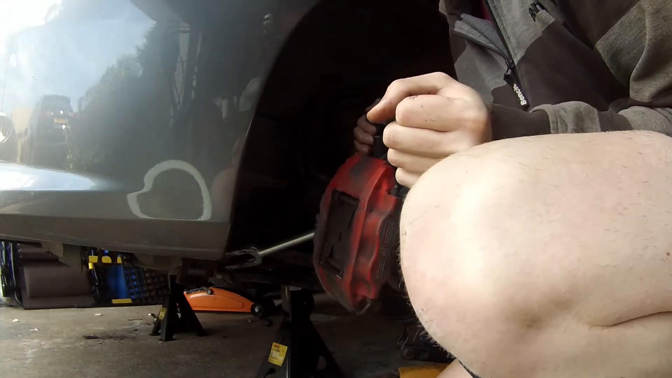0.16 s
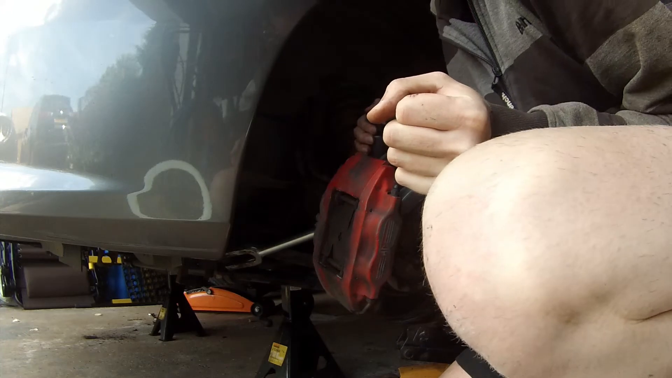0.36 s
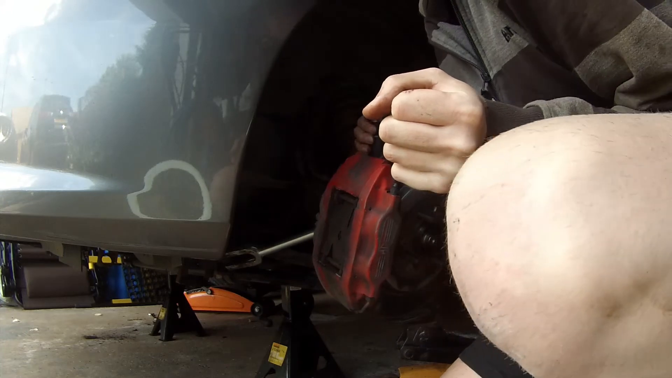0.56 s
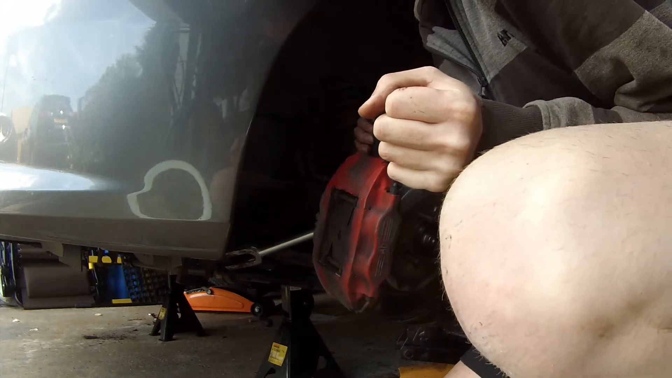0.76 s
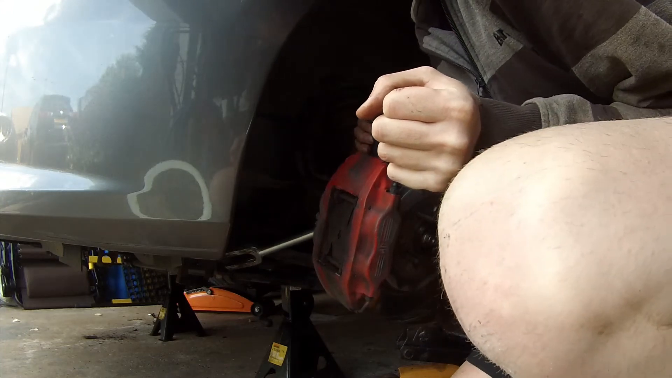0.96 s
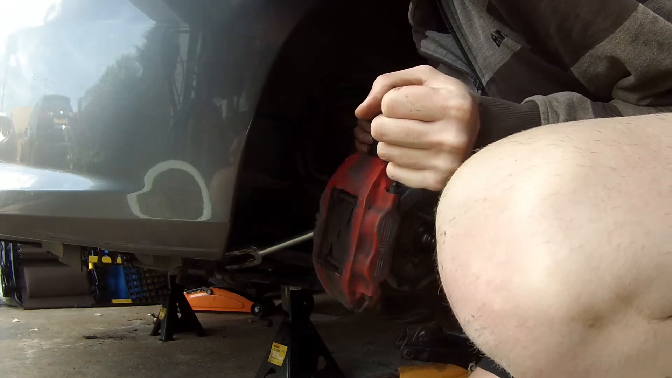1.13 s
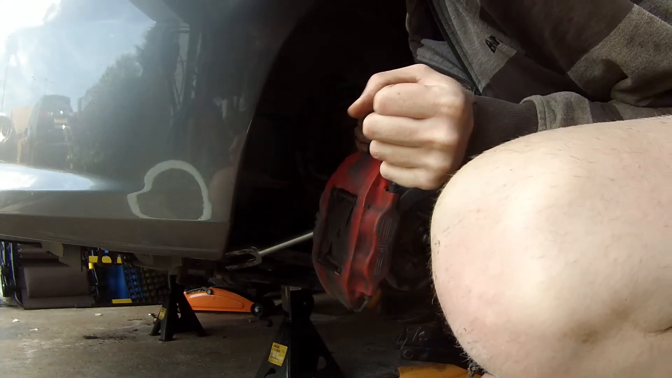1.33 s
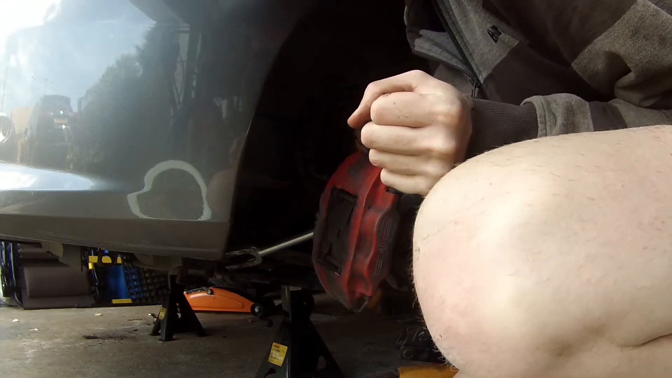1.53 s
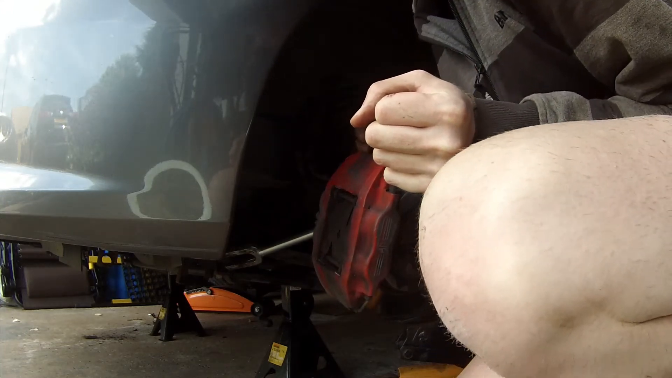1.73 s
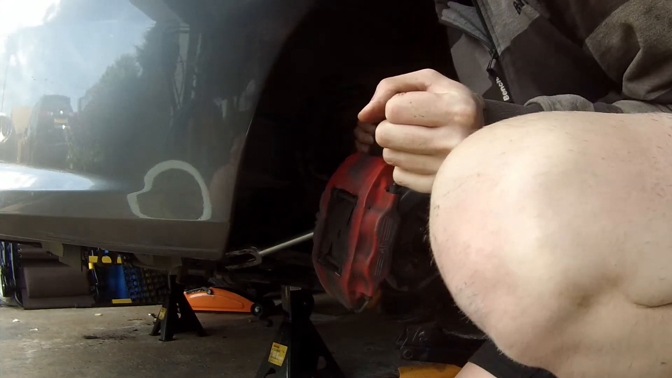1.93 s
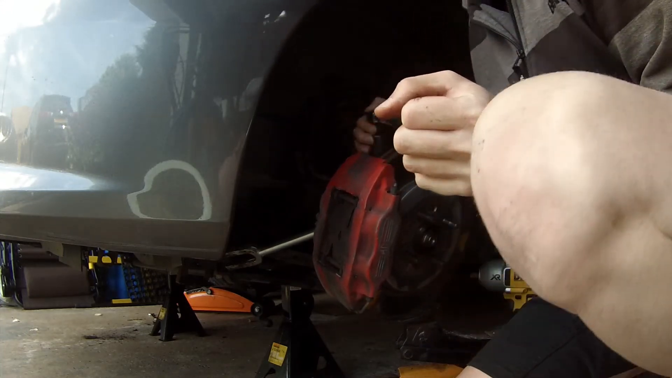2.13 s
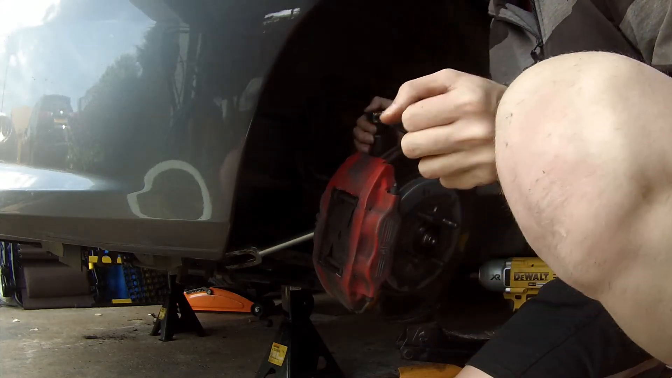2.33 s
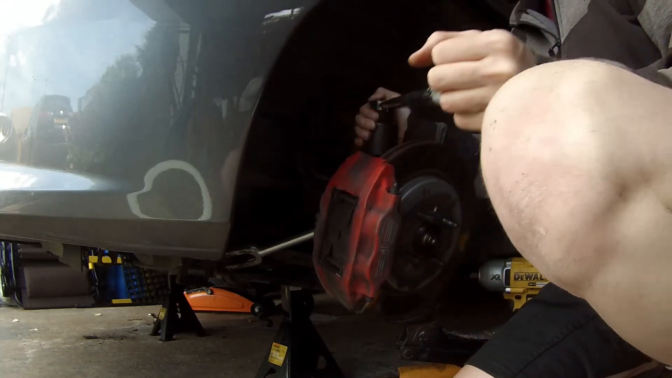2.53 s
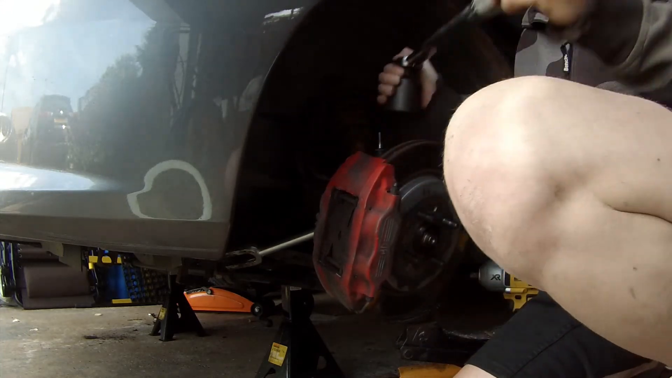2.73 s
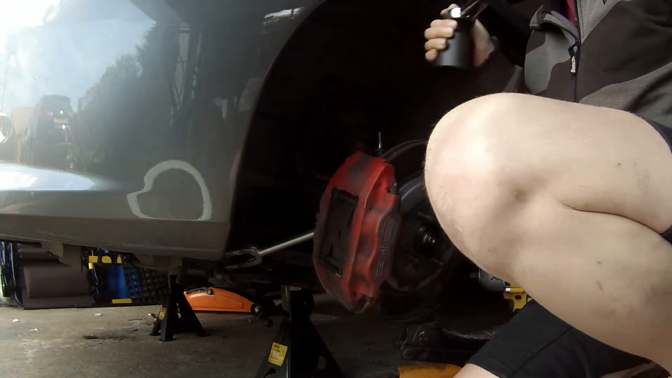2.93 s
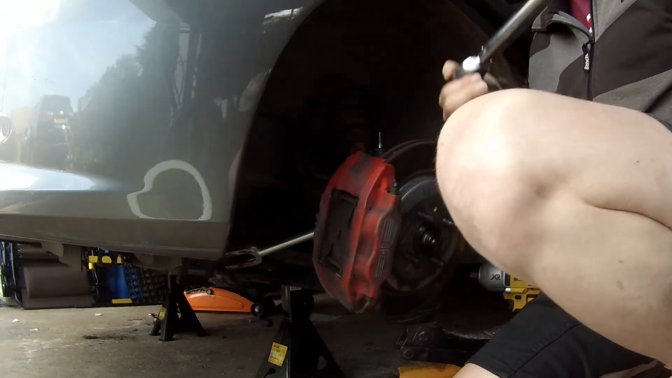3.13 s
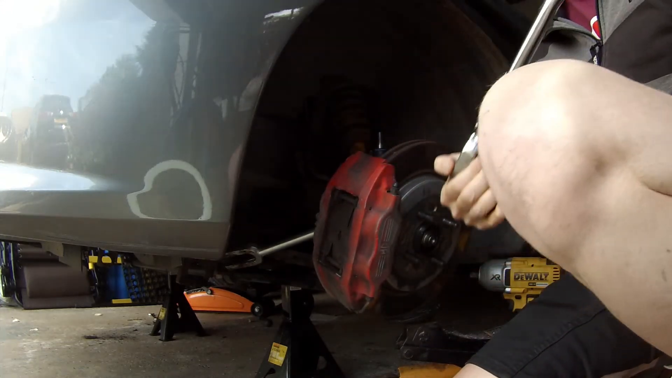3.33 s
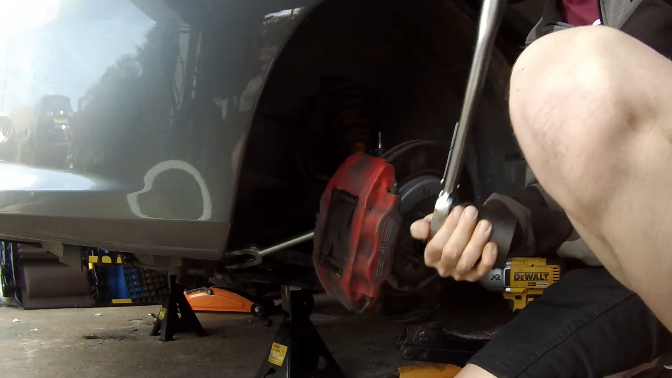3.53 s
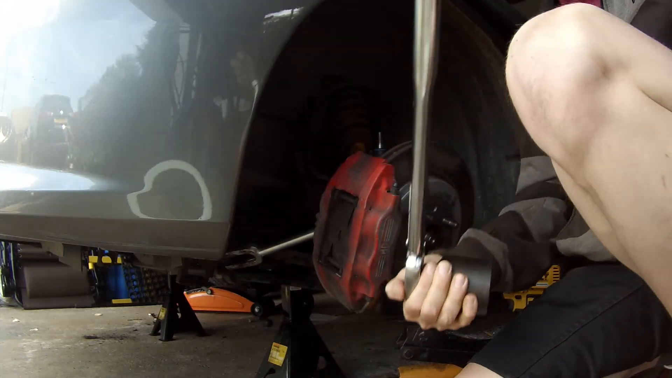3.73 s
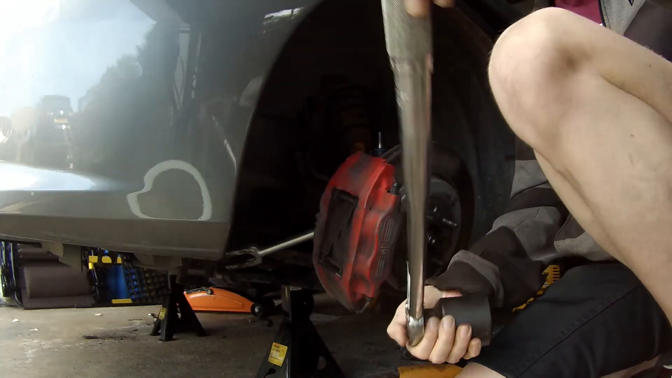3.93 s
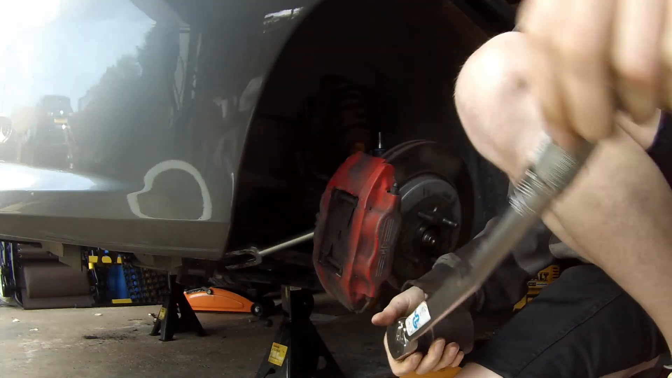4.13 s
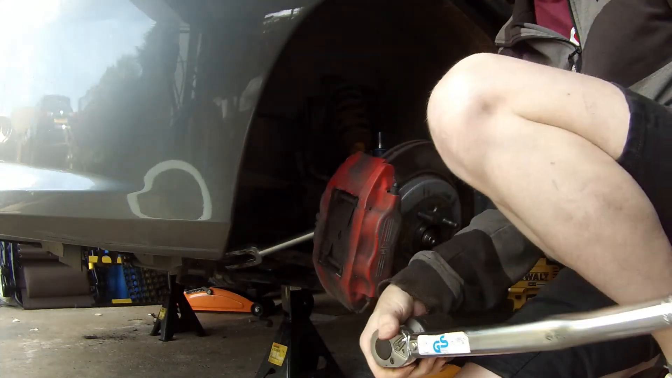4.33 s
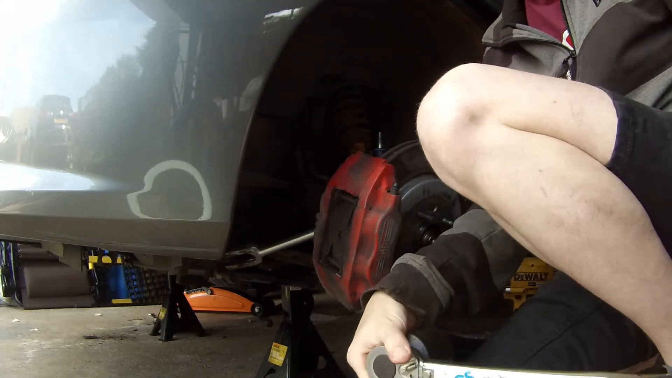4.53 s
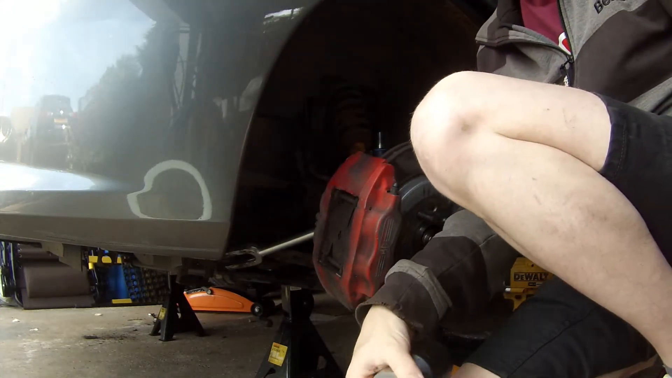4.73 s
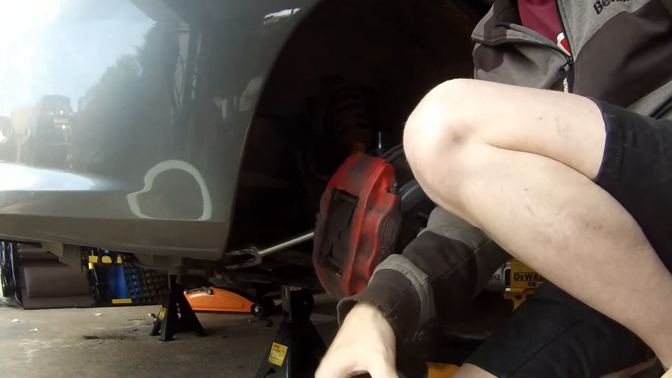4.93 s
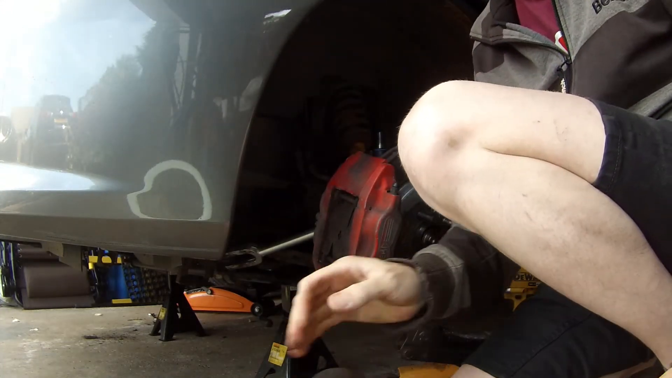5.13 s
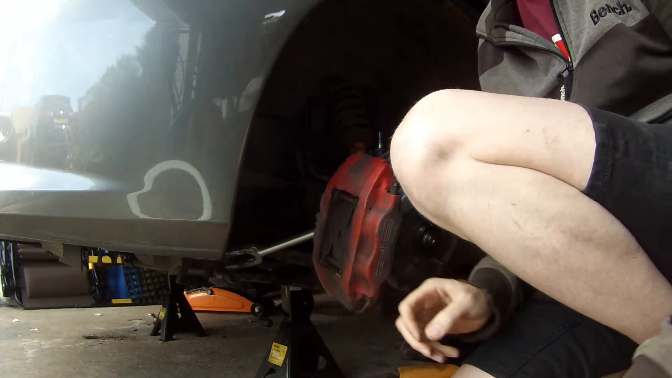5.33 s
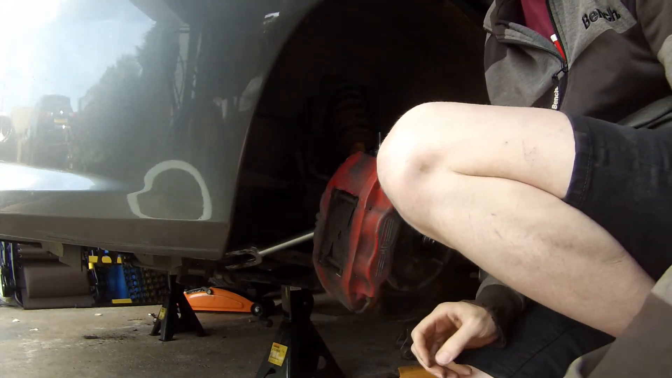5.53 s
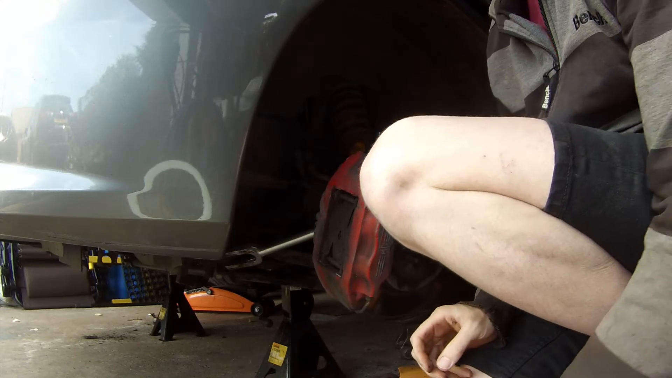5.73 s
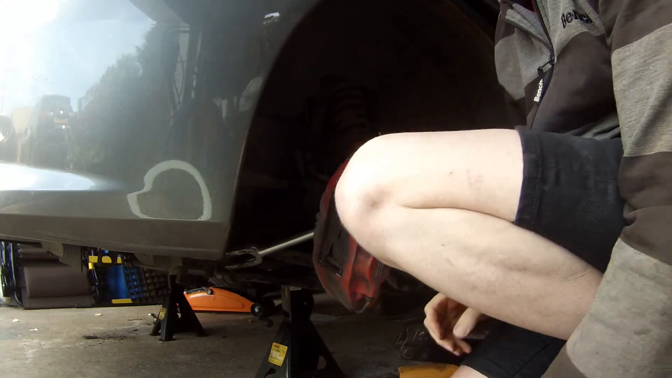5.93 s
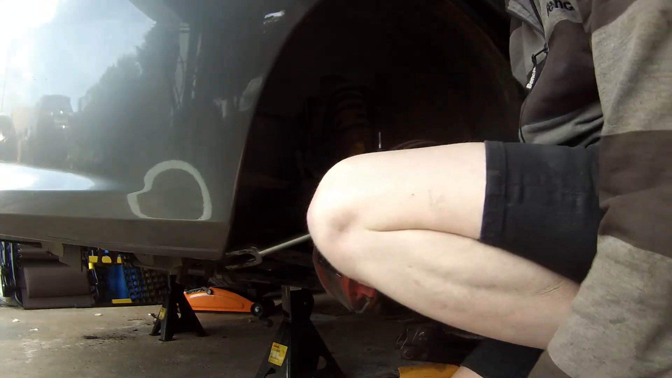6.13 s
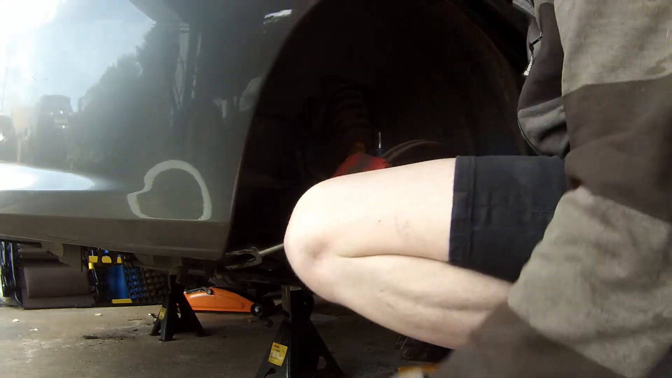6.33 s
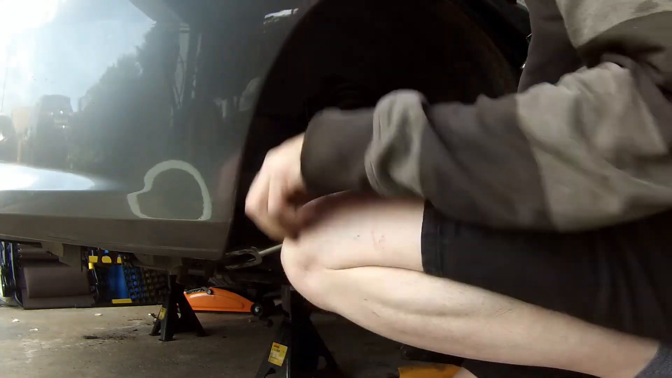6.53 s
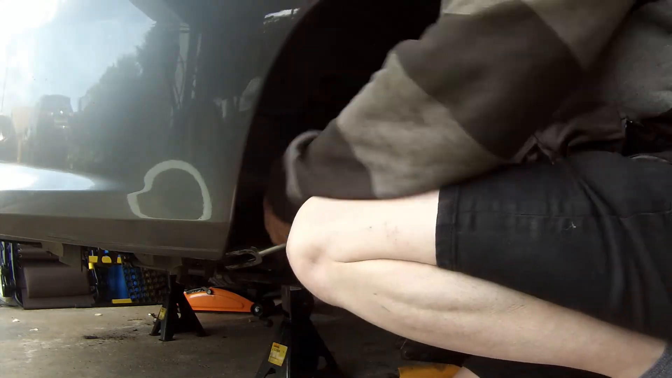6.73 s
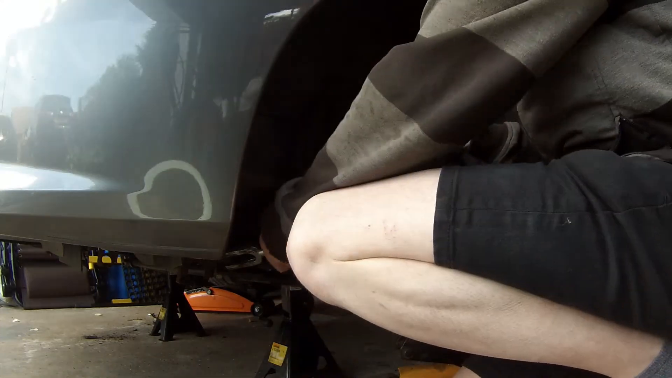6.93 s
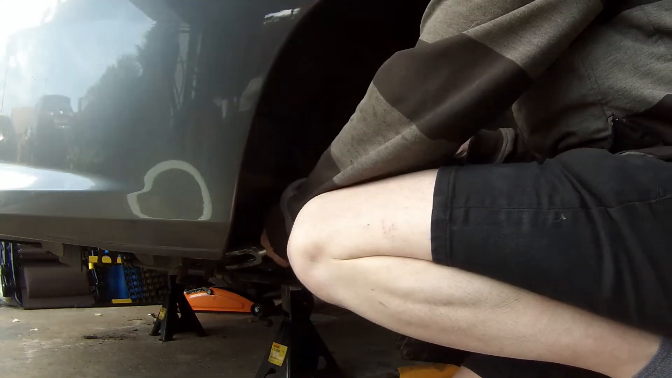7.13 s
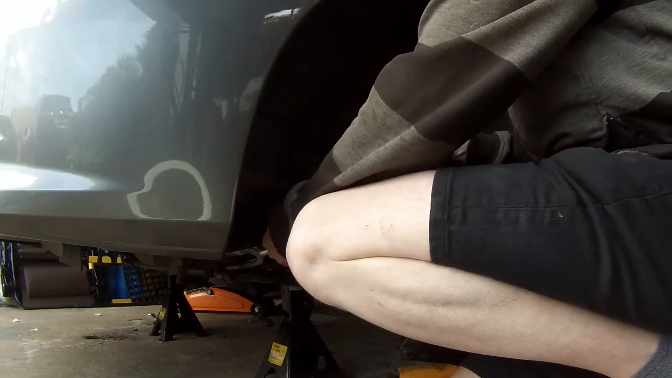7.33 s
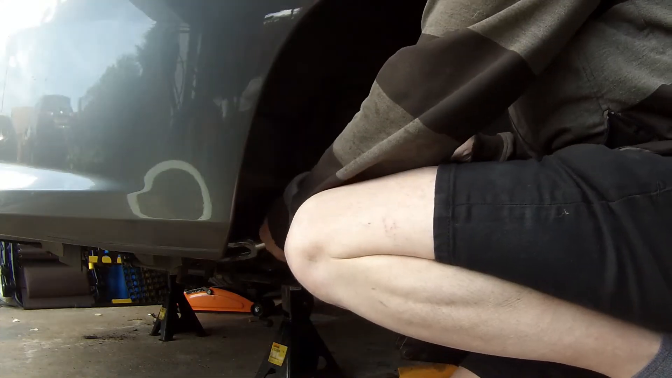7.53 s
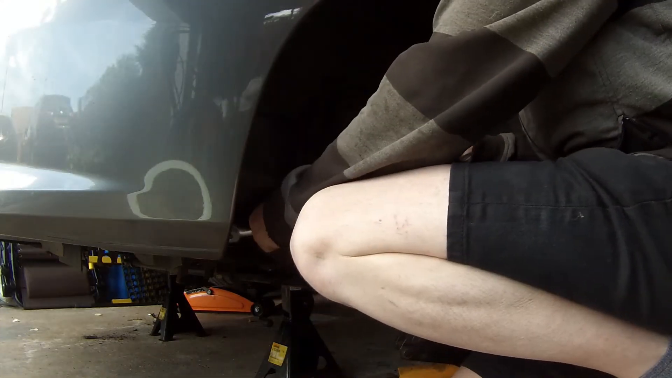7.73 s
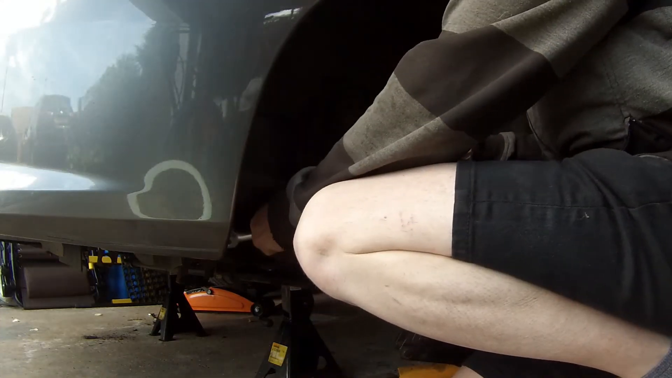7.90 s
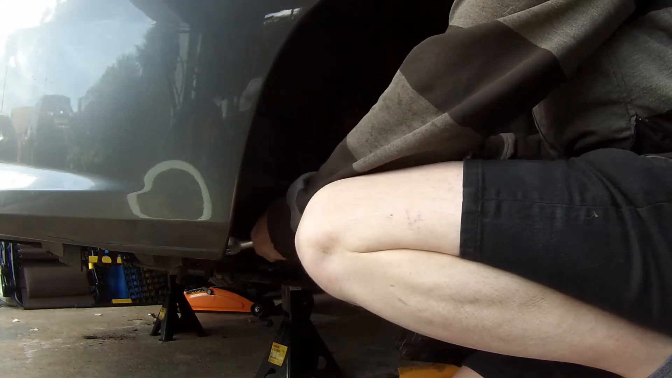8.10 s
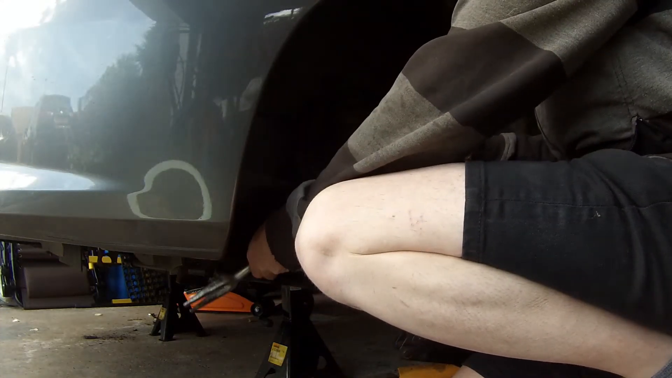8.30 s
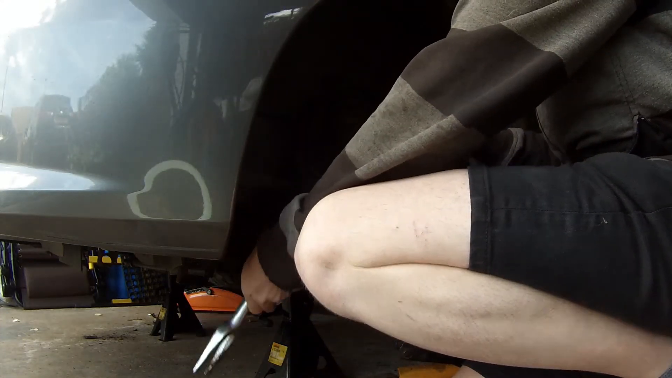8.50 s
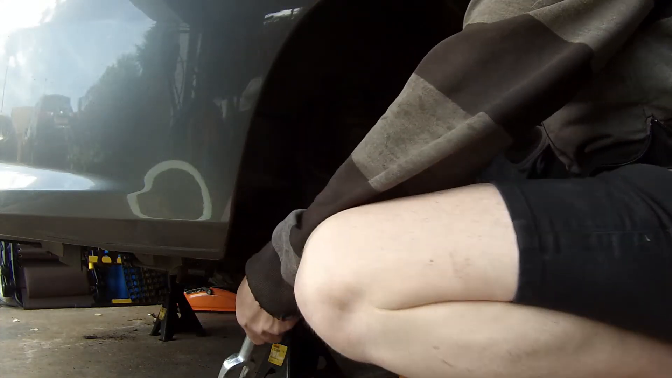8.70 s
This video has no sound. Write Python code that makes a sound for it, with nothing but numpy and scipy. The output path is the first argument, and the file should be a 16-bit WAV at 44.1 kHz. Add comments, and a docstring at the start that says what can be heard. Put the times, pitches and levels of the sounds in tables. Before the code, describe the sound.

A torque wrench snaps twice with a short metallic ring and body shudder, followed by floor knocks, cloth rustle and a clattering steel bar.

```python
"""Two hard steel clicks, floor knocks, then a singing steel bar, over a low hum and faint outdoor air.
In a small garage, a click-type torque wrench breaks over twice on a car's hub bolt, jolting suspension and body.
Wrench and socket are laid down; a forked steel bar is picked up off the concrete. Clothes creak and rustle.
Metal is made from short bursts of shaped noise plus fading sine waves; cloth and air are shaped noise."""
import sys
import numpy as np
from scipy import signal
from scipy.fft import rfft, irfft
from scipy.io import wavfile
from scipy.ndimage import uniform_filter1d

SR = 44100
rng = np.random.default_rng(int(sys.argv[2]) if len(sys.argv) > 2 else 0)


def store_pcm(level_fs):
    """Save levels as 16-bit WAV."""
    pcm = np.round(np.clip(level_fs, -1, 1) * 32767).astype(np.int16)
    wavfile.write(sys.argv[1], SR, np.atleast_2d(pcm).T)


N = 390581
TIME = np.arange(N) / SR
AGE = TIME[:32768]  # seconds since a single sound began
HZ = np.fft.rfftfreq(4096, 1 / SR)  # frequencies at which filters are drawn

# "Fade" below means the seconds a sound takes to drop by 60 dB.
# Outdoor air, its tone. Each row: frequency in Hz, level in dB.
AIR_COLOUR = [(12, -29), (20, 1), (70, -3), (129, -5), (232, -12), (534, -16), (958, -17), (1200, -20),
              (2000, -23.5), (2840, -26), (6910, -36), (14300, -46.5), (15500, -58)]
# Outdoor air, its loudness. Each row: time in seconds, level in dB.
AIR_LEVEL = [(0, -54), (.8, -53), (2.4, -51.5), (8.86, -52)]
# Rumble that follows the hum, its tone. Each row: frequency in Hz, level in dB.
RUMBLE_COLOUR = [(20, -2), (55, -3), (90, -10.5), (180, -7), (260, -21.5), (600, -44), (3000, -83.5)]
# Low hum, rising and falling, strongest at the end. Each row: time in seconds, level in dB.
HUM_LEVEL = [(0, -59), (2.7, -58.5), (3.1, -52), (3.7, -67), (4.35, -52), (5.1, -63.5), (6.3, -51.5),
             (7.3, -56), (7.9, -47.5), (8.86, -45.5)]
HUM_HZ, RUMBLE_DB = 62.5, -7.5  # the rumble is relative to the hum
HUM_WAVER_DB, HUM_WAVER_HZ = 2.8, 2.0  # typical (rms) wander

# Sleeve and grip creaking, one slip for each surge of the pull.
# Each row: start in seconds, length in seconds, level in dB.
CREAKS = [(0.541, 0.036, -58), (0.652, 0.06, -62.5), (0.726, 0.018, -59.5), (0.89, 0.11, -63),
          (1.028, 0.029, -51), (1.084, 0.027, -57.5), (1.133, .03, -55), (1.168, 0.026, -53),
          (1.272, 0.027, -56.5), (1.307, 0.015, -55)]
CREAK_ATTACK_S, CREAK_RELEASE_S = 0.0093, 0.026
# Tone of the creaks. Each row: frequency in Hz, level in dB.
CREAK_COLOUR = [(300, -26), (1500, -6), (2500, 5.5), (4000, -1), (6300, -3.5), (7500, -8), (10500, -9.5),
                (13000, -17), (15500, -16.5)]
# Clothes sliding as the body shifts, then a sleeve brushing the knee.
# Each row: start in seconds, length in seconds, level in dB, tilt in dB per octave, fizz in dB.
SHIFTS = [(5.352, 0.2, -52, 0, 1), (6.58, .1, -58.5, 3.5, 1), (6.661, 0.07, -57, 3.5, 6)]
SHIFT_ATTACK_S, SHIFT_RELEASE_SHARE = 0.057, 0.81  # release as a share of the stroke's length
FIZZ_HZ = 8000  # fizz lies above this
# Tone of sliding cloth. Each row: frequency in Hz, level in dB.
CLOTH_COLOUR = [(150, -13), (700, 12), (1500, 6), (3300, 7), (5500, -6), (9000, -16), (15000, -30)]

# Small ticks of the loaded wrench and of light handling. Each row: start in seconds, relative level in dB,
# centre in Hz, decay constant in seconds, half width in octaves.
TICKS = [(.9196, -32, 9500, 0.0011, 0.46), (.935, -28, 10100, 0.0023, 0.14),
         (1.023, -33, 10300, 0.0022, 0.37), (1.036, -26, 4000, 0.0036, .7), (1.135, -22, 5000, .0022, 0.72),
         (1.2996, -29, 8600, 0.002, 0.44), (1.539, -22, 2920, 0.0082, 0.62),
         (1.621, -26.5, 6950, 0.0026, 0.84), (4.974, -24.5, 2496, 0.0039, 0.42),
         (5.448, -18.5, 4100, .005, 0.29), (5.533, -14.5, 3380, 0.006, 0.2),
         (6.185, -16.5, 2480, 0.0058, 0.73), (6.451, -20.5, 3060, 0.0026, 0.57),
         (7.631, -31, 2170, 0.0058, 0.75), (7.691, -19, 2380, .012, .1)]
# Soft, dull bumps of handling. Each row: start in seconds, relative level in dB, centre in Hz,
# decay constant in seconds, half width in octaves.
BUMPS = [(2.478, -7.5, 1190, 0.021, 0.18), (2.482, -10, 380, 0.032, 0.94),
         (7.109, -16.5, 1180, 0.025, 0.98), (7.112, -8, 292, 0.014, .6), (7.365, -2.5, 294, 0.018, 0.61)]

# Wrench clicks. Each row: start in seconds, blow in dB, chatter length in seconds, main resonance in Hz,
# its lift in dB, tilt in dB per octave, rebound delay in seconds, rebound relative to the blow in dB,
# jolt into the car in dB, panel boom in dB.
CLICKS = [(1.3668, 18.5, 0.0021, 3184, 7, 0.9, .0039, -7.5, 0.5, -6.5),
          (1.9770, 16.5, .0015, 1820, 10.5, -0.2, .0025, -0.5, -0.5, 1)]
# Tone of steel slapping steel. Each row: frequency in Hz, level in dB.
CLICK_COLOUR = [(60, -21), (200, -14), (400, -13), (750, -10.5), (1300, -3.5), (2300, 0), (2900, -2.5),
                (4100, 0.5), (5200, -12), (6300, -11), (7600, -4.5), (9200, -16.5), (11000, -10),
                (12500, -26), (15500, -26)]
# The head swings back against the tube; the tilt is per octave.
REBOUND_HZ, REBOUND_LIFT_DB, REBOUND_TILT_DB, REBOUND_LENGTH_S = 4100, 2, 0.63, 0.00097
# Wrench, socket and bolt ringing at once. Each row: frequency in Hz, level before the jolt in dB, fade in seconds.
WRENCH_MODES = [(1010, -24.5, .11), (1190, -27, 0.12), (1370, -26, 0.25), (1740, -24, 0.09),
                (1935, -29, 0.16), (2216, -29.5, 0.17), (2378, -29.5, 0.24), (3008, -32, 0.12),
                (3360, -30.5, 0.12), (3498, -30.5, 0.14), (3763, -31.5, 0.13), (4002, -29.5, 0.15),
                (4000, -24.5, 0.11), (4387, -34, .13), (4747, -33, .1), (4944, -36.5, .14),
                (5950, -40.5, .14), (7073, -35, .13), (7260, -38, 0.16), (7480, -37, .11), (7897, -38, .09),
                (9590, -46, .1), (11340, -38.5, 0.076)]
# Hub and suspension, slower to build up. Each row: frequency in Hz, level before the jolt in dB, fade in seconds.
HUB_MODES = [(39.9, -33, .5), (101.6, -35, .55), (114, -25, 0.44), (143.1, -32, .36), (226.7, -33, .33),
             (317.7, -40, .42), (450, -41.5, 0.53), (549, -41, .48), (734, -36.5, .28), (854, -38, .15),
             (1372, -41.5, 0.28)]
# Body panels. Each row: frequency in Hz, level before boom and jolt in dB, fade in seconds.
PANEL_MODES = [(308, -29.5, 0.3), (350.5, -24, .22), (401, -33, 0.23), (747, -39.5, 0.2)]
# Many weaker steel tones. Each row: frequency in Hz, level before the jolt in dB.
STEEL_COLOUR = [(1500, -46.5), (2000, -43.5), (3000, -45), (4100, -47), (5200, -53), (7400, -44),
                (9000, -49)]
# How fast those tones die. Each row: frequency in Hz, fade in seconds.
STEEL_DECAY = [(1500, 0.17), (2800, 0.1707), (4200, .21), (9000, 0.095)]
# Dense shudder of suspension and panels. Each row: frequency in Hz, level before the jolt in dB.
BODY_COLOUR = [(35, 15.5), (75, 7.5), (120, 17), (160, 17.5), (195, 10.5), (320, 19.5), (600, 12.5),
               (1200, 10), (2000, 5), (3000, 4), (4100, 9), (5200, -4), (7400, -0.5), (11000, -2),
               (15000, -16.5)]
# How fast the shudder dies. Each row: frequency in Hz, fade in seconds.
BODY_DECAY = [(100, .37), (350, 0.37), (1000, 0.35), (4000, 0.24), (8000, 0.14), (14000, 0.069)]

# Lasting ring of coil spring and brake disc after each click. Each row: frequency in Hz, level in dB, fade in seconds.
SPRING_MODES = [(603, -46, .7), (899, -47.5, 1.3), (1034, -34.5, .55), (1071, -50, .6), (1222, -52, .66),
                (1324, -43.5, .6)]
# Steel left free to sing. Each row: start in seconds, frequency in Hz, level in dB, fade in seconds,
# beat in Hz, strength of the partner tone from 0 to 1.
SINGING = [(1.367, 6200, -47, 0.43, 2.3, 0), (5.921, 5660, -49, 0.33, 2.6, 0.3),
           (5.986, 5680, -52.5, 0.8, 2, 0.23), (6.267, 5690, -64, 1.05, 1.8, 0.5),
           (7.715, 4440, -55, 0.22, 5.7, 0.7), (8.02, 2113, -58, 4.8, 1.55, 0.8),
           (7.976, 9873, -56.5, 0.67, 2, 0.16), (7.976, 2430, -46, 0.18, 2, 0),
           (7.976, 4400, -50, 0.12, 2, 0), (7.976, 4880, -51, 0.13, 2, 0.1), (7.976, 6700, -54, 0.18, 2, 0),
           (7.976, 9200, -58, .16, 2, .1)]

# Tools knocking on the floor. Each row: start in seconds, blow in dB, chatter length in seconds,
# tilt in dB per octave, low thud in dB, socket ring relative to the blow in dB.
KNOCKS = [(5.9204, 8, 0.00088, 3, 12.5, 4.5), (5.9266, 3.5, 0.0017, 0.5, -3, -10),
          (5.942, -4.5, 0.0013, -1.5, 1.5, -6), (5.947, -7, 0.0018, -0.5, 7, 3),
          (5.9855, 4, 0.00076, -6.5, -26, -5), (6.2633, -4.5, 0.003, -4, 10, -15),
          (6.2656, 2.5, 0.002, -1.5, -1, -11), (6.2715, 10.5, 0.0063, -3.5, -21, -1),
          (6.3030, -5.5, 0.0082, -2, 1.5, -12), (6.326, -5, 0.0024, -3.5, -4, -12)]
# Tone of the knocks. Each row: frequency in Hz, level in dB.
KNOCK_COLOUR = [(50, -4.5), (160, -9), (240, -1), (320, -4.5), (480, 0), (850, -4), (1150, -2), (1600, -7),
                (2550, -1), (3300, -9.5), (4300, -13), (5000, -22.5), (9000, -22.5), (12000, -40),
                (15500, -39)]
# Short ring of the socket on the wrench head. Each row: frequency before detuning in Hz,
# level before the blow in dB, fade in seconds.
SOCKET_MODES = [(2538, -38, 0.062), (2500, -39.5, 0.048), (1185, -55, 0.058), (1875, -43, 0.029),
                (3290, -46, 0.069), (4110, -54, 0.067)]

# The forked bar dragged and lifted. Each row: start in seconds, blow in dB, chatter length in seconds,
# tilt in dB per octave, low thud in dB, rasp in Hz, rasp in dB, ring relative to the blow in dB.
CLANKS = [(7.7974, 3, .002, 1, -5, 3100, 18, -8), (7.8014, 10.5, 0.014, -3, 0, 3050, 9, -1),
          (7.819, 5, 0.008, 1.5, 5, 727, 13.5, 3), (7.838, 4.5, 0.0078, -4.5, -3, 2380, 12, -3),
          (7.846, -5.5, 0.0048, -4.5, 4.5, 770, 12, -12), (7.863, -6.5, 0.0034, -5, 8.5, 417, 1, -9),
          (7.873, -10, 0.0036, -6, -2, 755, 22, -12), (7.9058, 1, 0.0048, -0.5, 2, 3210, 17, -4.5),
          (7.916, -2, .006, -4.5, -0.5, 3200, 14, 3), (7.947, -7, 0.0066, -1, 6, 3150, 8, 0),
          (7.9762, -1.5, 0.014, -4, 0.5, 2450, 4, -11)]
RASP_WIDTH_OCTAVES = 0.12
# Tone of the bar's contacts. Each row: frequency in Hz, level in dB.
BAR_COLOUR = [(60, -11), (150, -11), (260, 0), (500, -3), (730, 0), (950, -7), (1700, -8), (2350, -4.5),
              (2750, -7.5), (3150, -5.5), (3700, -19), (4400, -20), (5500, -28), (9000, -30), (15000, -52)]
# Brief ring of the bar. Each row: frequency in Hz, level before the blow in dB, fade in seconds.
BAR_MODES = [(257, -42.5, .23), (708, -45.5, .17), (1353, -50, 0.38), (1911, -45, .18), (2160, -45, .099),
             (2366, -41.5, 0.19), (2410, -44, .08), (2649, -49, 0.18), (2853, -52, 0.14), (3150, -47, 0.15),
             (4395, -49.5, .12), (5200, -64, .07), (6255, -66, .1), (7720, -64, 0.14)]

# Garage reflections against direct sound. Each row: frequency in Hz, level in dB.
GARAGE_COLOUR = [(60, 0), (300, -3.5), (1000, -4), (3000, -16.5), (8000, -8), (15000, -15.5)]
# How fast the reflections die. Each row: frequency in Hz, fade in seconds.
GARAGE_DECAY = [(100, 0.2), (500, 0.18), (2000, .2), (6000, 0.049), (14000, 0.1)]
EDGE_HZ = 15400  # top of the recorder's band


def amp(db):
    """Turns decibels into a plain multiplier."""
    return 10 ** (np.asarray(db) / 20)


def unit(x):
    """Scales a signal to an average (rms) strength of 1."""
    return x / np.sqrt(np.mean(x ** 2) + 1e-20)


def read(points, hz=HZ):
    """Reads a table between its rows, along a log-frequency axis."""
    f, value = np.transpose(points)
    return np.interp(np.log(hz + 1), np.log(f + 1), value)


def level(rows):
    """Turns a loudness curve in dB into multipliers, silent outside its span."""
    s, db = np.transpose(rows)
    return np.interp(TIME, s, amp(db), left=0, right=0)


def add(mix, s, sound):
    """Mixes a sound in at time s."""
    part = mix[round(s * SR):][:len(sound)]
    part += sound[:len(part)]


def colour(x, db):
    """Filters x with the gain db over HZ, without sounding ahead of time."""
    # Folding the cepstrum (the log spectrum's transform) gives a minimum-phase filter
    cepstrum = irfft(db * np.log(10) / 20)
    half = len(cepstrum) // 2
    cepstrum[1:half] *= 2
    cepstrum[half + 1:] = 0
    response = irfft(np.exp(rfft(cepstrum)))
    return signal.fftconvolve(x, response)[:len(x)]


def drift(rate):
    """Slow random wandering of rms 1, up to about rate swings a second."""
    knots = np.arange(0, TIME[-1] + 1, .5 / rate)
    heights = rng.standard_normal(size=2000)[:len(knots)]
    return unit(np.interp(TIME, knots, heights))


def chatter(length, decay, rough_db):
    """Rattling contact force: white noise of energy 1, hardest at first touch, then dying unevenly."""
    first_touch = 1 + 0.11 * np.exp(-AGE / 0.00063)
    envelope = np.exp(-np.maximum(AGE - length, 0) / decay) * first_touch
    judder = amp(rough_db * unit(uniform_filter1d(rng.standard_normal(len(AGE)), size=50)))
    spectrum = rfft(rng.standard_normal(len(AGE)) * envelope * judder)
    spectrum /= np.sqrt(uniform_filter1d(abs(spectrum) ** 2, size=200))  # evens out the tone
    force = irfft(spectrum) * np.exp(-AGE / (length + 10 * decay))
    return force / np.linalg.norm(force)


def ring(modes, rise_cycles):
    """Adds up fading tones; the low ones take longest to build up."""
    total = 0
    for hz, db, fade in modes:
        rise = 1 - np.exp(-AGE * hz / rise_cycles)
        tone = np.sin(2 * np.pi * (hz * AGE + rng.random()))
        total = total + amp(db - 60 * AGE / fade) * rise * tone
    return total


def tail(spectrum, decays, rise_cycles, delay):
    """A dense ring of noise, each band dying at its own speed."""
    hz, t, bands = signal.stft(rng.standard_normal(len(AGE)), SR, nperseg=256)
    rise = delay + rise_cycles / (hz[:, None] + 100)
    shape = amp(-60 * t / read(decays, hz)[:, None]) * (1 - np.exp(-t / rise))
    shape /= np.sqrt(len(AGE) * np.mean(shape ** 2, axis=1, keepdims=True))
    wash = signal.istft(bands * shape, SR, nperseg=256)[1][:len(AGE)]
    return colour(wash * np.minimum(AGE / delay, 1), read(spectrum))


def background():
    """Outdoor air through the door, and a wavering low hum that brings its own rumble."""
    air = unit(colour(rng.standard_normal(N), read(AIR_COLOUR)))
    air = air * level(AIR_LEVEL) * amp(0.51 * drift(rate=14.0))
    pitch = HUM_HZ + HUM_WAVER_HZ * drift(rate=10.0)
    hum = np.sin(2 * np.pi * np.cumsum(pitch) / SR) * amp(HUM_WAVER_DB * drift(rate=5.1))
    rumble = colour(rng.standard_normal(N), read(RUMBLE_COLOUR))
    return air + level(HUM_LEVEL) * (unit(hum) + amp(RUMBLE_DB) * unit(rumble))


def sweep(s, length, db, attack, release):
    """Loudness of a sliding stroke: it builds up, holds until its length is over and dies away."""
    rise = np.clip((TIME - s) / attack, 0, 1)
    fall = np.exp(-np.maximum(TIME - s - length, 0) / release)
    return amp(db) * rise * fall


def rub(spectrum_db, grains_per_s, spread_db, hiss):
    """Fibres catching and letting go, over a smooth sliding hiss."""
    catches = rng.random(N) < grains_per_s / SR
    strength = amp(spread_db * np.minimum(rng.exponential(1, N), 3))
    grains = catches * rng.standard_normal(N) * strength
    return unit(colour(unit(grains) + hiss * rng.standard_normal(N), spectrum_db))


def clothes():
    """A creaking grip during the pull; afterwards softer swishes that catch unevenly on folds."""
    grip = sum(sweep(*row, CREAK_ATTACK_S, CREAK_RELEASE_S) for row in CREAKS)
    out = grip * rub(read(CREAK_COLOUR), grains_per_s=2500, spread_db=0.5, hiss=.6)
    folds = amp(1.2 * drift(rate=26))
    for s, length, db, tilt_db, fizz_db in SHIFTS:
        tilt = tilt_db * np.log2((HZ + 500) / 2500)
        fizz = fizz_db / (1 + (FIZZ_HZ / (HZ + 1)) ** 6)
        cloth = rub(read(CLOTH_COLOUR) + tilt + fizz, grains_per_s=660, spread_db=0.0, hiss=1.0)
        stroke = sweep(s, length, db, SHIFT_ATTACK_S, SHIFT_RELEASE_SHARE * length)
        out = out + stroke * folds * cloth
    return out


def ticks():
    """Light contacts and soft bumps, each with one resonance."""
    out = np.zeros(N)
    for s, db, hz, decay, width in [*TICKS, *BUMPS]:
        hump = -10 * np.log10(1 + (np.log2((HZ + 1) / hz) / width) ** 6)
        onset = 1 - np.exp(-AGE / (0.18 * decay))  # softer things also meet more slowly
        contact = chatter(0, decay, rough_db=0.4) * onset
        add(out, s, amp(db + 4.5) * colour(contact, hump))
    return out


def slap(db, length, hz, lift_db, tilt_db):
    """Steel strikes steel: a short, hard chatter with one raised resonance."""
    resonance = lift_db * np.exp(-(np.log2((HZ + 1) / hz) / 0.17) ** 2)
    tilt = tilt_db * np.log2((HZ + 500) / 3000)
    force = chatter(length, decay=0.0023, rough_db=2.0)
    return amp(db) * colour(force, read(CLICK_COLOUR) + resonance + tilt)


def wrench():
    """The pawl slips, the head slaps the tube and rebounds; the blow runs through the bolt into hub and body."""
    out = np.zeros(N)
    partials = np.geomspace(1500, 9000, 60)
    partials = partials * (1 + 0.02 * rng.uniform(-1.2, 1, len(partials)))  # uneven spacing
    steel_modes = zip(partials, read(STEEL_COLOUR, partials), read(STEEL_DECAY, partials))
    steel = ring(steel_modes, rise_cycles=3.1)
    for s, db, length, hz, lift_db, tilt_db, rebound_s, rebound_db, jolt_db, boom_db in CLICKS:
        add(out, s, slap(db, length, hz, lift_db, tilt_db))
        rebound = slap(db + rebound_db, REBOUND_LENGTH_S, REBOUND_HZ, REBOUND_LIFT_DB, REBOUND_TILT_DB)
        add(out, s + rebound_s, rebound)
        metal = steel + ring(WRENCH_MODES, rise_cycles=0.97) + ring(HUB_MODES, rise_cycles=2.4)
        panels = amp(boom_db) * ring(PANEL_MODES, rise_cycles=1.7)
        shudder = tail(BODY_COLOUR, BODY_DECAY, rise_cycles=7.2, delay=0.0033)
        add(out, s, amp(jolt_db) * (metal + panels + shudder))
    return out


def singing():
    """Thin lasting tones of free steel: the spring after each click, and tones or slowly beating pairs."""
    out, t = np.zeros(N), TIME[:2 * SR]
    for s, *_ in CLICKS:
        add(out, s, ring(SPRING_MODES, rise_cycles=2.1))
    for s, hz, db, fade, beat, share in SINGING:
        pair = np.sin(2 * np.pi * hz * t) - share * np.sin(2 * np.pi * (hz + beat) * t)
        add(out, s, amp(db - 60 * t / fade) * pair)
    return out


def blow(db, length, tilt_db, thud_db, body_db, decay, rough_db):
    """One contact with the floor, with its own balance of low thud and brightness."""
    tilt = tilt_db * np.log2((HZ + 500) / 2500)
    thud = thud_db / (1 + (HZ / 900) ** 2)
    return amp(db) * colour(chatter(length, decay, rough_db), body_db + tilt + thud)


def knocks():
    """Wrench and socket touch down and rock on the concrete; each new contact detunes the socket a little."""
    out = np.zeros(N)
    for s, db, length, tilt_db, thud_db, ring_db in KNOCKS:
        modes = [(hz * (1 + 0.04 * rng.uniform(-1.0, 1)), mode_db, fade) for hz, mode_db, fade in SOCKET_MODES]
        contact = blow(db, length, tilt_db, thud_db, read(KNOCK_COLOUR), decay=0.0054, rough_db=1.5)
        add(out, s, contact + amp(db + ring_db) * ring(modes, rise_cycles=1.5))
    return out


def bar():
    """The forked bar judders over the floor, each contact rasping at its own pitch, and rings briefly in the hand."""
    out = np.zeros(N)
    for s, db, length, tilt_db, thud_db, rasp_hz, rasp_db, ring_db in CLANKS:
        rasp = rasp_db * np.exp(-(np.log2((HZ + 1) / rasp_hz) / RASP_WIDTH_OCTAVES) ** 2)
        scrape = blow(db, length, tilt_db, thud_db, read(BAR_COLOUR) + rasp, decay=0.007, rough_db=3.0)
        add(out, s, scrape + amp(db + ring_db) * ring(BAR_MODES, rise_cycles=7.4))
    return out


def scene():
    """Close sounds with the garage's short reverberation; singing steel and background join without it."""
    near = clothes() + ticks() + wrench() + knocks() + bar()
    garage = tail(GARAGE_COLOUR, GARAGE_DECAY, rise_cycles=2.3, delay=0.0023)
    room = signal.fftconvolve(near, garage)[:N]
    return (near + room + singing() + background())[None]


def record(dry):
    """The recorder's band limit: a low-pass filter takes away the very highest treble."""
    low_pass = signal.firwin(401, EDGE_HZ, window=("kaiser", 8), fs=SR)
    return signal.oaconvolve(dry, low_pass[None], "same")


dry = scene()
out = record(dry)
store_pcm(out)
```